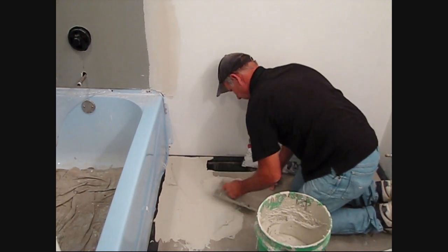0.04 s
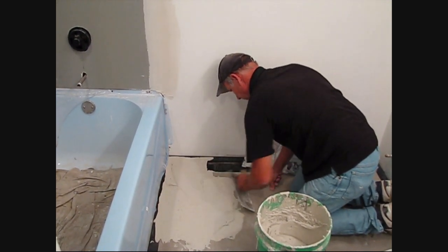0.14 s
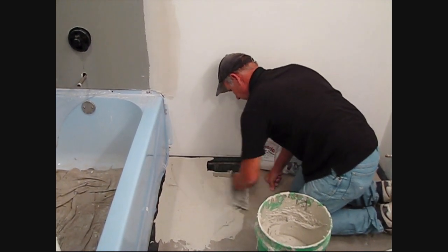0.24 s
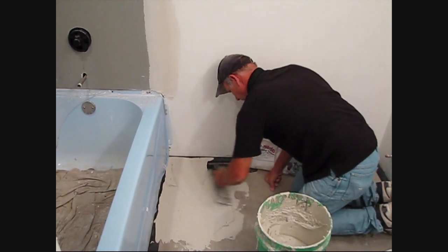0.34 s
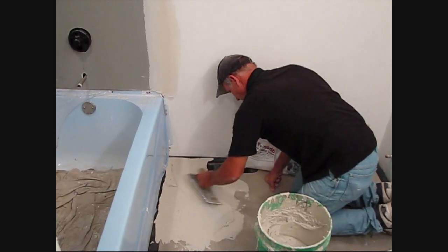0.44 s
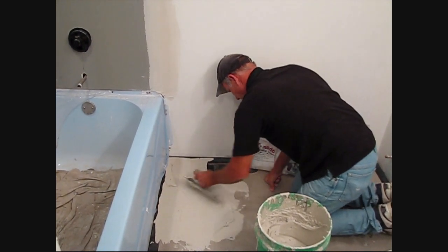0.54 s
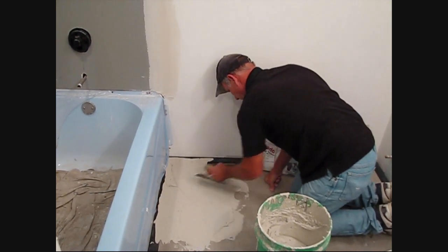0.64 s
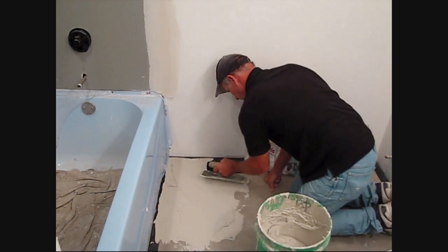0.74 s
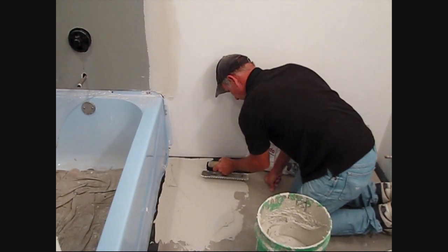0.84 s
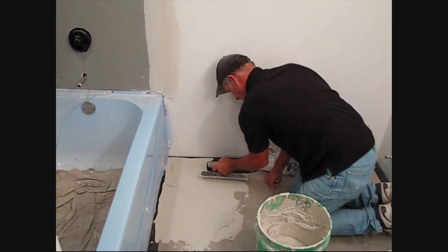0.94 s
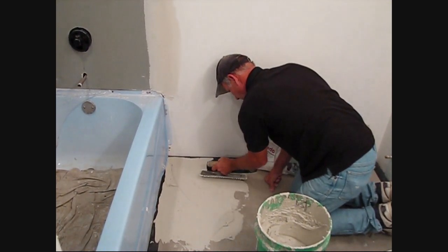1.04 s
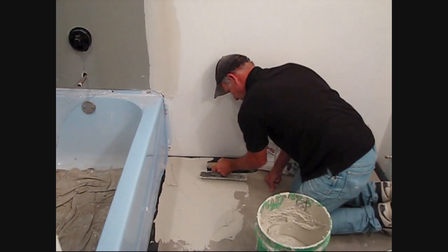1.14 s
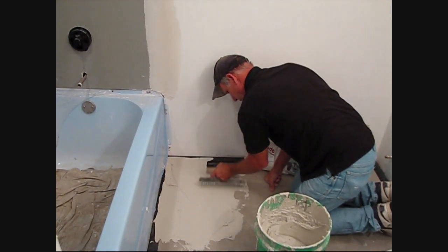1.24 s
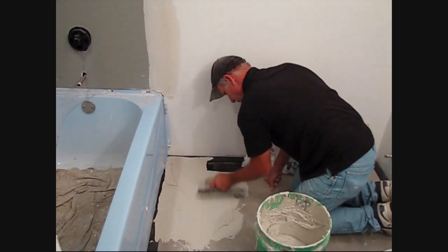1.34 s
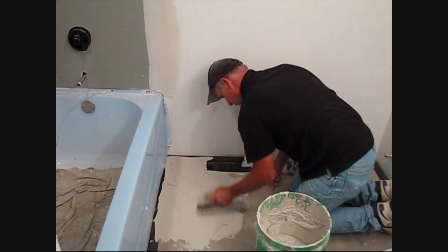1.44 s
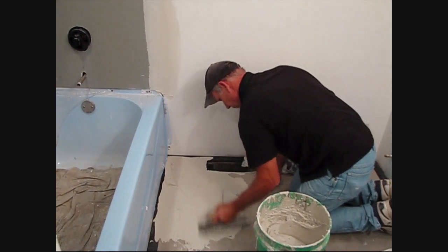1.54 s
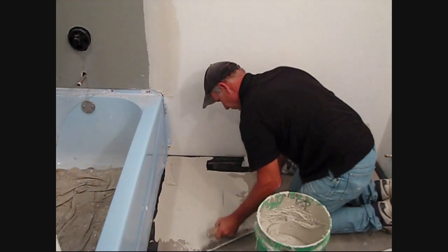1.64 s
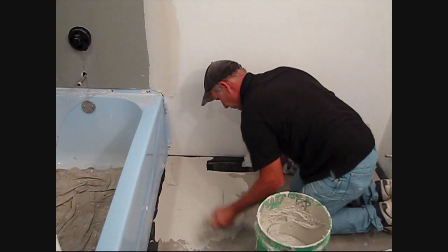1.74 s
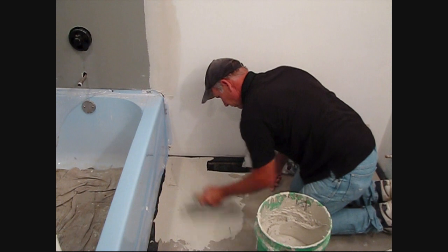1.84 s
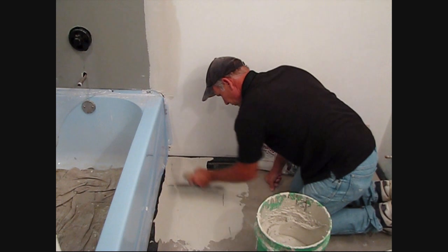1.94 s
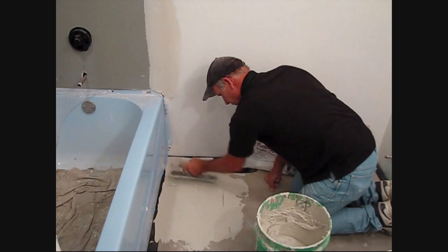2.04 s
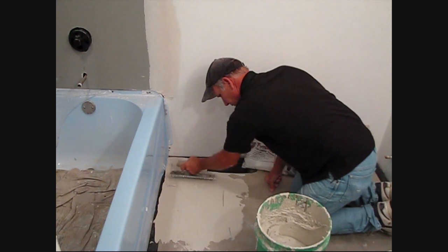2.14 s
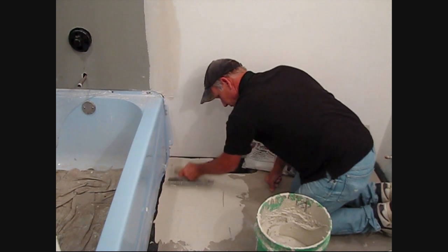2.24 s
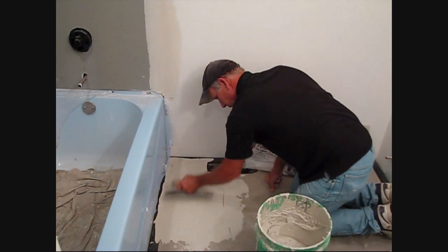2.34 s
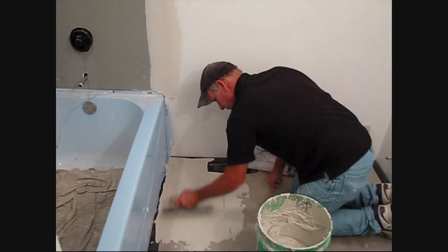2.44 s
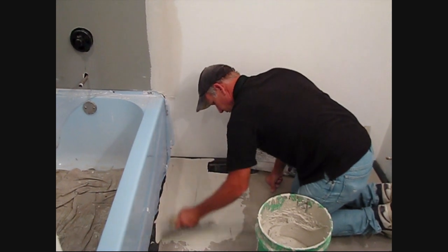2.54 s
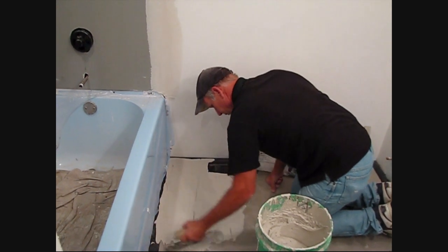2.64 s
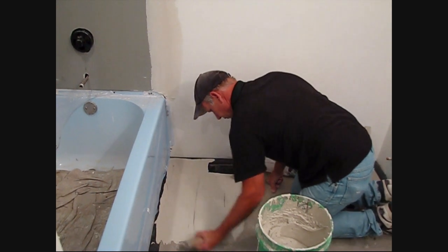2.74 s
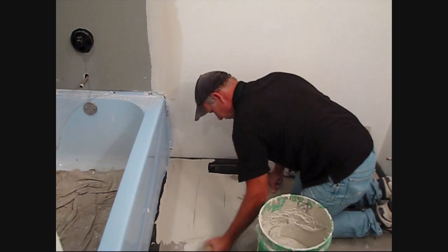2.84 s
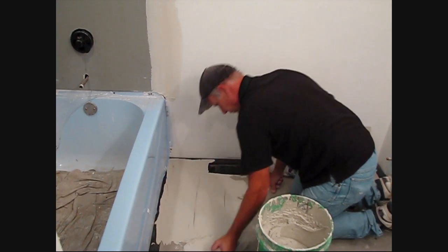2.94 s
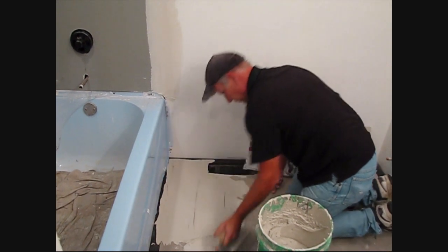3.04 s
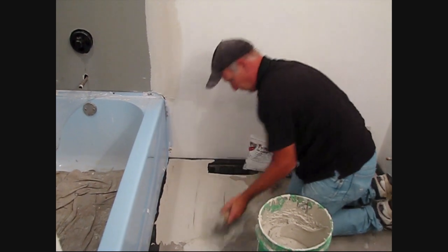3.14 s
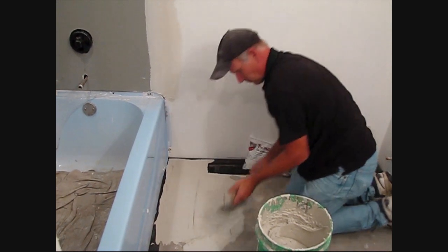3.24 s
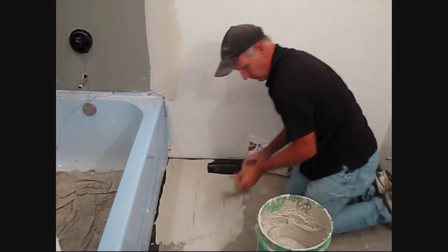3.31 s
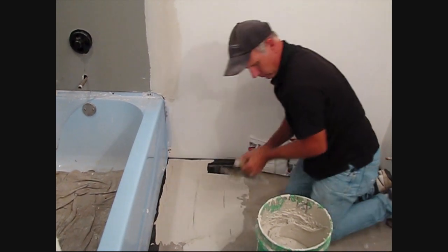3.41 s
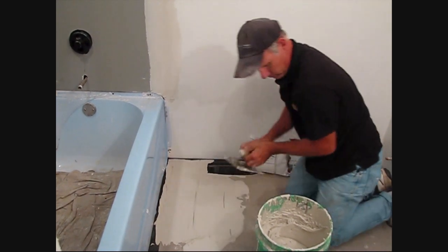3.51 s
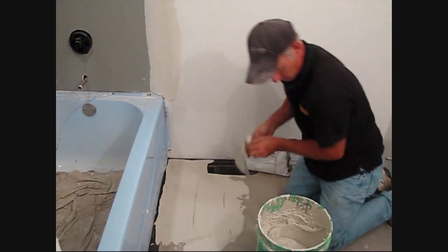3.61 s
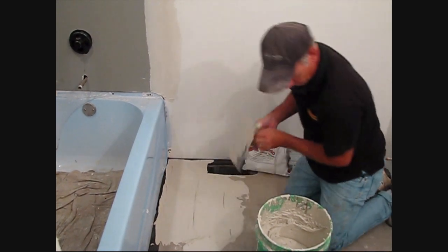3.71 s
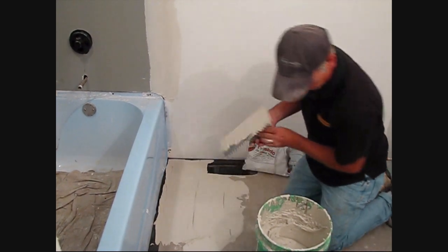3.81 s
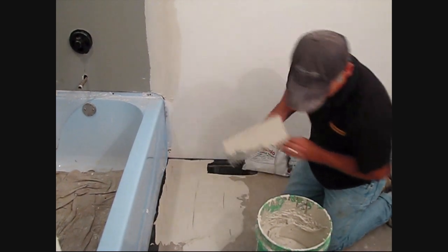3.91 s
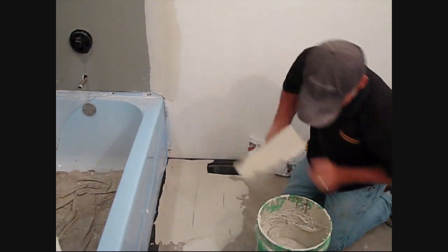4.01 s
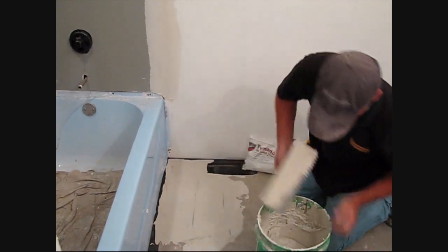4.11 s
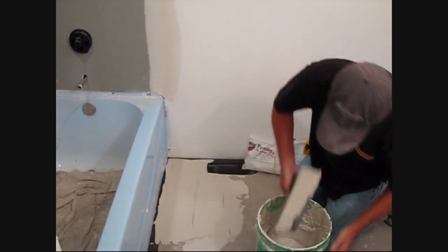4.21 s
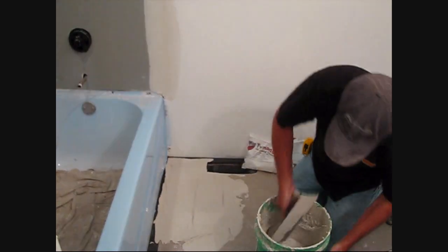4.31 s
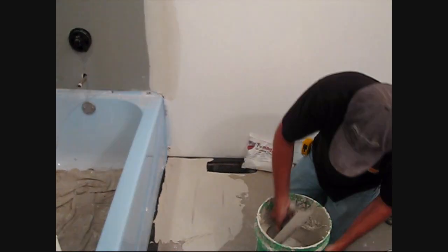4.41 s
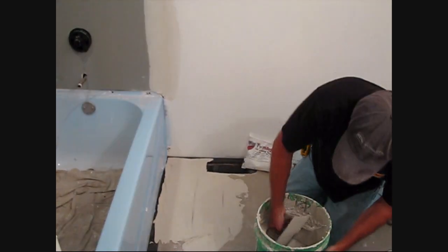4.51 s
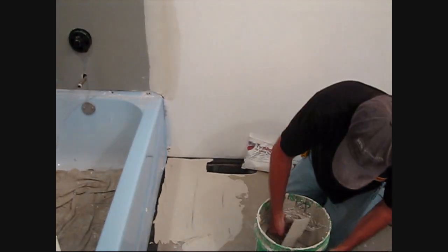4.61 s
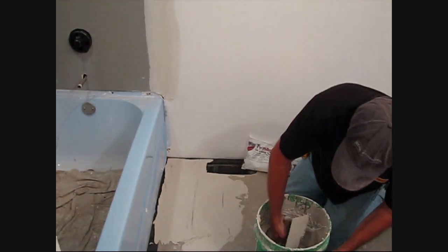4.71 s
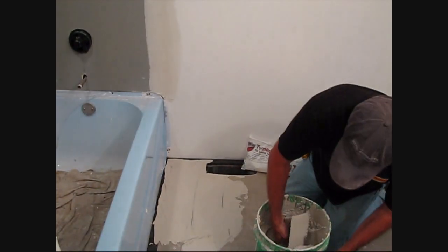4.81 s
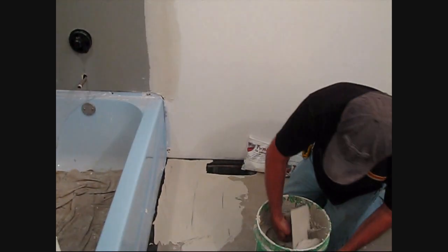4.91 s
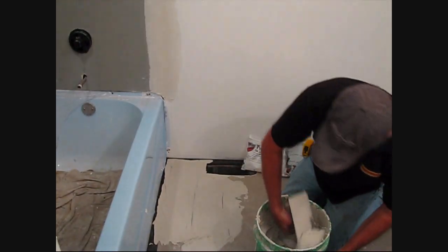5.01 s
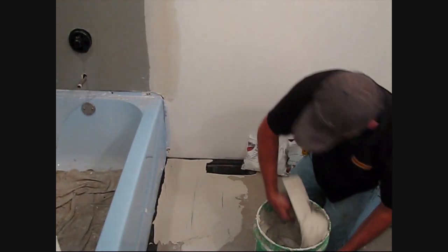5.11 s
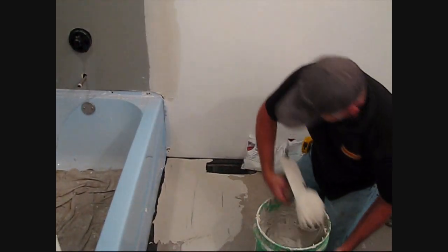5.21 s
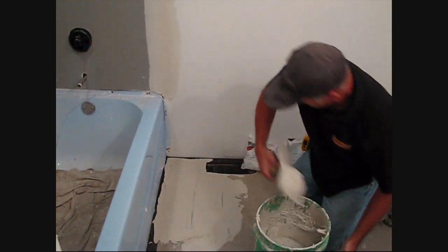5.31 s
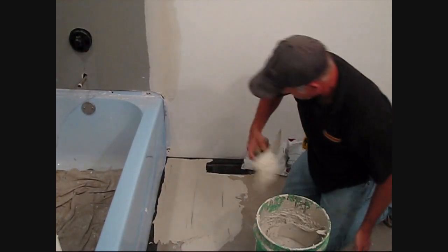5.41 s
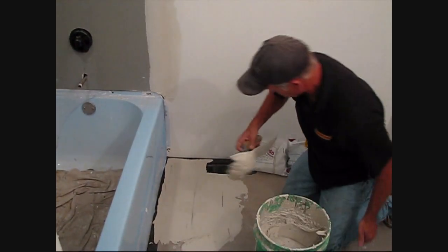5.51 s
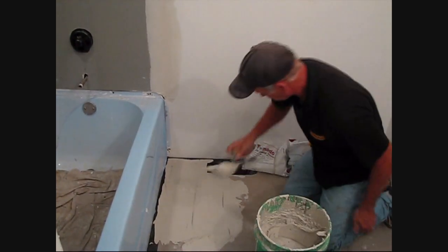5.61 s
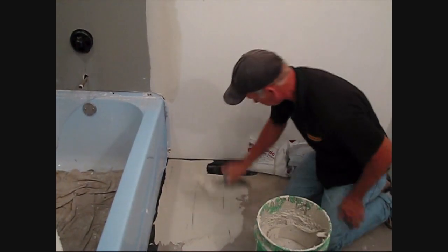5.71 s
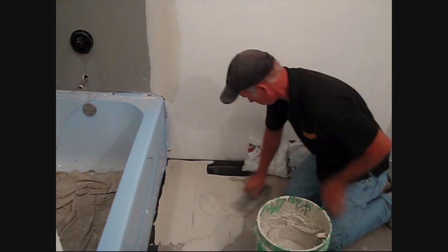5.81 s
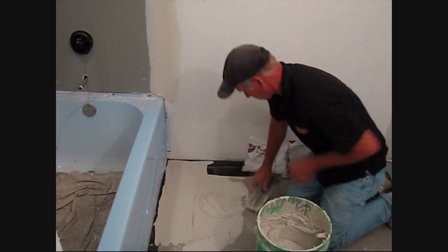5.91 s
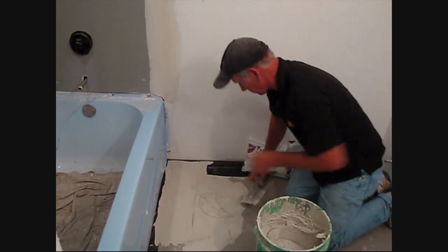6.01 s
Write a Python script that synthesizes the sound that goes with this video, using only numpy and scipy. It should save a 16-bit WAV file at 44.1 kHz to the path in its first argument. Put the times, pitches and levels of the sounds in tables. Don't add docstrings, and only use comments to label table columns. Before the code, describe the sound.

Close stereo microphone in a small hard-walled room with a low hum. Gritty steel scrapes come in bursts with gaps between, some short and bright, some longer and harsher. Around the middle they give way to quiet sleeve rustles and dull knee bumps. Squelchy scooping in a plastic bucket follows, growing into a rough hollow scrape, then near silence and one sharp wet smack with a low thud and short echo.

```python
import sys
import numpy as np
from scipy import signal
from scipy.io import wavfile
from scipy.ndimage import uniform_filter1d, map_coordinates

SR = 44100
rng = np.random.default_rng(int(sys.argv[2]) if len(sys.argv) > 2 else 0)


def digitize_waveform(pressure):
    field = np.atleast_2d(pressure).T
    bounded = np.clip(field, -1, 1)
    quanta = np.round(bounded * 32767).astype(np.int16)
    wavfile.write(sys.argv[1], SR, quanta)


def magnitude_from_level(level_db):
    exponent = np.asarray(level_db, float) / 20
    return 10 ** exponent


N = 267246

# f/Hz, level/dB per Hz
HUM_SPECTRUM = [(29, -24), (50, -24), (129, -2), (172, -6.5), (253, 0.5), (293, -1.5), (339, 3),
                (431, -15.5), (464, -5), (717, -17), (771, -10.5), (1110, -16), (6040, -27.5),
                (8070, -30.5), (16300, -38)]
# t/s, level/dB
HUM_LEVEL = [(0.0, -33.5), (.1, -64), (.3, -49), (.4, -51), (1.1, -44), (1.5, -46), (2.1, -46.5),
             (2.5, -38), (3.1, -44.5), (4.2, -43.5), (4.7, -39), (5.6, -42), (6.06, -42)]
# f/Hz, level/dB re usual hum
WHINE_TONES = [(7854, -83), (7881, -65)]
# t/s, level/dB, decay/s
KNEE_THUMPS = [(.33, -45, 0.027), (1.03, -43, 0.064), (1.972, -51, 0.097), (2.83, -32, 0.027),
               (3.14, -37, 0.24), (3.27, -42, .08), (3.38, -55, 0.034), (3.7, -46.5, 0.15),
               (3.92, -56, 0.11), (4.34, -40, 0.035), (4.46, -49, 0.21), (4.78, -48, 0.046),
               (5.11, -58, 0.094), (5.8, -50, 0.23)]
# level/dB, rise/s, decay/s
SLAP_BASS = (-27, 0.043, 0.052)

# f/Hz, correlation
PORT_LIKENESS = [(60, 0.86), (180, 1), (550, 0.94), (1650, 0.7), (4970, 0.021), (15000, 0.034)]
# f/Hz, t60/s
WALL_T60 = [(60, 0.05), (260, 0.12), (730, 0.48), (1840, 0.42), (4850, 0.36), (9000, 0.39), (15000, 0.29)]

# f/Hz, level/dB per Hz
GRIT_SPECTRUM = [(1290, -22.5), (2200, -8), (2740, -7), (3310, -7), (5140, -10), (8500, -22),
                 (11000, -32.5), (18700, -120)]
FIZZ_SPECTRUM = [(4410, -32.5), (7500, -8.5), (13500, -10), (16000, -14)]
SQUELCH_SPECTRUM = [(300, -50), (600, 9), (1200, 5), (2000, 9.5), (3000, 2.5), (4500, -5.5), (9000, -74)]

# t/s, rise/s, fall/(dB/s), grit level/dB, fizz level/dB re grit
CLOTH_BRUSHES = [
    (3.25, .11, 110, -43, -8),
    (3.49, 0.036, 74, -52.5, 3),
    (3.605, 0.013, 96, -45, -9),
    (3.8, 0.01, 41, -48, 1.5),
    (3.88, 0.029, 120, -50, 0),
    (4.0, 0.04, 10, -56, -12),
    (4.17, 0.044, 60, -52.5, -3),
    (5.33, 0.018, 17, -52.5, -8),
    (5.6, 0.055, 30, -62, -9),
]
# t/s, rise/s, fall/(dB/s), grit level/dB, squelch level/dB re grit
DIG_MOVES = [(4.297, 0.019, 148, -43.5, 17), (4.33, 0.028, 299, -39, 7.5), (4.44, 0.04, 39, -43.5, 1.5),
             (4.54, 0.04, 150, -43, 9), (4.654, 0.0033, 62, -35, 0), (4.74, 0.037, 122, -40.5, 5),
             (4.85, 0.073, 60, -46.5, 3), (4.96, 0.054, 68, -35.5, -2), (5.03, 0.0072, 150, -30.5, 5),
             (5.065, 0.07, 154, -20.5, 0.5), (5.12, 0.037, 295, -13.5, -3), (5.74, 0.11, 133, -40.5, 2)]
# f/Hz, width/Hz, level/dB
BUCKET_MODES = [
    (252, 220, -7.5),
    (330, 25, 12),
    (506, 4.6, 5),
]

# t/s, peak level/dB, length/s
LUMP_IMPACTS = [
    (5.8528, 3, 0.0044),
    (5.8561, -9.5, 0.00284),
    (5.88, -9, 0.0043),
    (5.87, -19.5, 0.088),
]
# f/Hz, level/dB per Hz
SLAP_SPECTRUM = [(15, -35), (25, 0), (150, -10.5), (237, -1), (613, -16.5), (826, -9.5), (945, -17.5),
                 (2130, -11.5), (3470, -17), (12800, -29.5), (16300, -35)]
# f/Hz, level/dB, decay/s
FLOOR_THUDS = [(67, -18, 0.048), (224, -16, 0.052), (379, -18, 0.014)]

# t/s, peak level/dB, f/Hz
GRAIN_SNAPS = [
    (0.015, -24, 2180),
    (0.0374, -22, 1870),
    (1.074, -24, 2110),
    (1.2212, -20, 2500),
    (2.6444, -29, 1520),
    (4.6573, -20.5, 1690),
]
# t/s, length/s, f/Hz, level/dB
MODE_SINGS = [(0.036, 0.093, 714, -28.5), (.13, .13, 730, -39), (.375, 0.058, 1860, -18),
              (0.531, 0.088, 744, -27.5), (.64, .17, 740, -49), (1.261, 0.081, 723, -25.5),
              (1.26, 0.085, 335, -29), (1.467, 0.12, 1535, -18), (2.32, 0.041, 1400, -26),
              (2.375, 0.043, 1150, -30), (2.42, 0.14, 1444, -33), (2.632, 0.056, 315, -26.5),
              (2.858, 0.073, 1670, -20.5), (2.985, 0.043, 1800, -16.5), (3.016, .05, 1060, -19),
              (3.03, 0.11, 710, -25.5), (3.18, 0.066, 1176, -39), (3.23, 0.0675, 700, -51),
              (4.96, 0.072, 313, -32), (5.025, 0.048, 327, -24.5), (5.141, 0.063, 280, -19)]
# t/s,
# length/s, f/Hz, level/dB
WIDE_SCUFFS = [(1.072, .008, 8100, -37), (1.47, .12, 530, -32), (1.219, 0.085, 1510, -27),
               (2.38, 0.033, 2840, -28), (2.44, .13, 2670, -29), (2.84, 0.12, 545, -35),
               (2.99, .1, 330, -35.5), (3.03, 0.099, 543, -33.5), (3.624, .04, 2850, -45),
               (4.298, .03, 169, -33.5), (4.3, 0.096, 339, -30.5), (4.302, 0.098, 3000, -38),
               (4.55, .07, 1500, -44), (4.654, 0.089, 330, -31.5), (4.655, 0.053, 757, -33.5),
               (4.74, 0.13, 750, -36), (5.853, .012, 1480, -11.5), (5.89, 0.093, 356, -29)]

# t/s, rise/s, fall/(dB/s), grit level/dB, upper ring f/Hz
BLADE_STROKES = [(.016, 0.0055, 241, -19, 1910), (.09, 0.035, 271, -43, 1970),
                 (.319, 0.0084, 64, -31, 1740), (.35, 0.048, 257.5, -27, 1920), (.5, .05, 210, -30, 1970),
                 (1.043, 0.0019, 48, -40, 1360), (1.13, 0.047, 60, -41.5, 2380),
                 (1.219, 0.0022, 106, -30, 2270), (1.23, 0.031, 201, -22, 2060),
                 (1.3, 0.017, 150, -29.5, 1490), (1.455, 0.029, 115, -25.5, 1580),
                 (1.53, 0.033, 294, -30, 1470), (1.62, 0.026, 255, -25.5, 1750),
                 (1.69, 0.048, 454, -33, 1530), (2.25, 0.034, 60, -46.5, 1570),
                 (2.322, 0.0092, 62, -41.5, 1310), (2.35, 0.046, 150, -35, 1180),
                 (2.42, 0.093, 28, -37.5, 1530), (2.55, 0.017, 100, -34, 1560),
                 (2.6, 0.041, 242, -21.5, 1450), (2.828, 0.055, 180, -19.5, 1560),
                 (2.972, 0.022, 188, -17, 1700), (3.02, 0.046, 330, -25.5, 1450),
                 (3.15, 0.039, 120, -46, 1250)]
# t/s, then low ring, upper ring and fizz level/dB re grit
HAND_GRIP = [(.03, 0.5, 10.3, -5), (.12, 3.5, 19, 0), (.33, 8, 9, 2.5), (0.412, 6.5, 14.6, 1),
             (.56, 6, 9.1, 1), (1.1, 0, 1.8, -7), (1.25, 3, 5.2, -0.5), (1.34, 6.5, 11.5, 0),
             (1.5, 5, 13.9, 2), (1.66, -2.5, 9.8, 2), (1.75, 0, 9.5, -4.5), (2.291, -15, 0.33, 0),
             (2.35, -16, 14.6, 3), (2.52, 7.5, 15.4, 3), (2.64, 2, 5.5, 0.5), (2.88, -5, 4.2, 4),
             (3.0, -7, 1, -5), (3.1, -4, 1.6, -6)]
# f/Hz, width/Hz, level/dB
LOW_BLADE_MODES = [(430, 150, -6), (560, 110, -4), (650, 70, -4), (735, 45, 1), (840, 90, -4),
                   (950, 90, -4)]
UPPER_BLADE_MODES = [(1060, 26, 0.5), (1265, 73, 5.5), (1376, 89, -6), (1535, 66, 3), (1770, 51, -10),
                     (1800, 18, 1), (1909, 89, -3), (1977, 134, 4), (2430, 30, -3), (2370, 72, -9),
                     (2660, 6.5, -17)]


def evened(x):
    return x / np.sqrt(np.mean(x ** 2) + 1e-20)


def read(points, hz):
    f, value = np.transpose(points)
    return np.interp(np.log(hz + 1), np.log(f + 1), value)


def curve(rows):
    s, value = np.transpose(rows)
    return np.interp(np.arange(N) / SR, s, value)


def colour(x, points):
    gain_db = np.maximum(read(points, abs(np.fft.fftfreq(8192, 1 / SR))), -90)
    log_gain = np.log(magnitude_from_level(gain_db))
    taps = np.fft.ifft(np.exp(np.conj(signal.hilbert(log_gain)))).real[:4096]
    return signal.oaconvolve(x, taps)[:len(x)]


def resonate(x, hz, width):
    turn = np.exp(2j * np.pi * np.cumsum(hz * np.ones(len(x))) / SR)
    r = np.exp(-np.pi * width / SR)
    return 2 * (turn * signal.lfilter([1 - r], [1, -r], x / turn)).real


def ring(x, modes):
    out = np.zeros(len(x))
    for k, (hz, width, db) in enumerate(modes):
        r = np.exp(-np.pi * width / SR)
        pole = r * np.exp(2j * np.pi * hz / SR)
        out += (-1) ** k * magnitude_from_level(db) * signal.lfilter([1 - r], [1, -pole], x).real
    return out


def in_band(x, lo_hz, hi_hz):
    bandpass = signal.butter(4, [lo_hz, hi_hz], "bandpass", fs=SR, output="sos")
    band = signal.sosfilt(bandpass, x)
    return x / np.sqrt(np.mean(band ** 2))


def swell(s, db, rise, decay):
    out = np.zeros(N)
    part = out[round(s * SR):][:SR]
    u = np.arange(len(part)) / SR
    part += magnitude_from_level(db) * np.minimum(u / rise, 1) * np.exp(-np.maximum(u - rise, 0) / decay)
    return out


def contact(table, fade=1, lag_s=0):
    floor, rise_power = 1e-7, 0.94
    power_sum = np.full(N, floor)
    mixed = np.full(N, floor * table[0][4])
    for s, rise, fall_db, db, value in table:
        at = round((s + lag_s) * SR)
        length_s = min(rise + 50 / fall_db, 1)
        t = np.arange(min(round(length_s * SR), N - at)) / SR
        fallen_db = fade * fall_db * np.maximum(t - rise, 0)
        power = np.minimum(t / rise, 1) ** (2 * rise_power) * magnitude_from_level(2 * (db - fallen_db))
        power_sum[at:at + len(t)] += power
        mixed[at:at + len(t)] += power * value
    return np.sqrt(power_sum - floor), mixed / power_sum


def diffuse(frames, size):
    hz = np.fft.rfftfreq(size, 1 / SR)
    a, b, c, d = rng.standard_normal((frames, len(hz), 4)).T
    same = np.clip(read(PORT_LIKENESS, hz), -1, 1)[:, None]
    left = a + 1j * b
    right = same * left + np.sqrt(1 - same ** 2) * (c + 1j * d)
    return hz, np.array([left, right])


def background():
    hz, z = diffuse(frames=N // 512 + 5, size=2048)
    z = z * magnitude_from_level(read(HUM_SPECTRUM, hz))[:, None]
    hum = evened(signal.istft(z, nperseg=2048, noverlap=1536)[1][:, :N])
    level = magnitude_from_level(curve(HUM_LEVEL))
    hum_level = level + swell(LUMP_IMPACTS[0][0], *SLAP_BASS)

    t = np.arange(N) / SR
    whine = sum(magnitude_from_level(db + 44.5) * np.sin(2 * np.pi * f * t) for f, db in WHINE_TONES)

    boards = ring(rng.standard_normal(N), [(23.8, 23, 0)])
    boards = evened(ring(boards, [(33.6, 97, 0)]))
    rise_s = 0.027
    thumps = sum(swell(s - rise_s, db, rise_s, decay) for s, db, decay in KNEE_THUMPS)
    knees = level * magnitude_from_level(-10) + thumps
    return hum_level * magnitude_from_level(0.5) * hum + level * whine + knees * boards


def sway(x, depth_s, per_s):
    t = np.arange(N) / SR
    rates = rng.uniform(.4, 1.6, size=4)
    path = sum(np.sin(2 * np.pi * (f * per_s * t + rng.random())) for f in rates)
    return map_coordinates(x, [np.arange(N) + depth_s * SR * path], order=3)


def room(x):
    out = np.zeros((2, N))
    turn = np.arange(N) / SR * 25
    for k in range(3):
        hz, z = diffuse(frames=220, size=512)
        frame_s = np.arange(220) * 128 / SR
        z *= magnitude_from_level(-60 * frame_s / read(WALL_T60, hz)[:, None])
        tail = signal.istft(z, nperseg=512, noverlap=384)[1]
        tail *= np.minimum(np.arange(tail.shape[1]) / (0.013 * SR), 1)
        tail /= np.linalg.norm(tail, axis=1, keepdims=True)
        share = np.sqrt(8 / 9) * np.cos(turn + k * np.pi / 3) ** 2
        wet = signal.oaconvolve(x[None] * share, tail, axes=1)[:, :N]
        out += [sway(port, depth_s=.000025, per_s=9) for port in wet]
    return out


def near_walls(x):
    n = np.arange(600)
    taps = rng.standard_normal(600) * np.exp(-n / (0.0048 * SR)) * (n > 10)
    treble = signal.butter(1, 2500, "highpass", fs=SR)
    unlike = signal.lfilter(*treble, taps / np.linalg.norm(taps))
    direct = x * magnitude_from_level(np.array([[-.2], [.2]]))
    return direct + 0.83 * np.array([[1], [-1]]) * signal.oaconvolve(x, unlike)[:N]


def grains(per_s, spread_db):
    size = magnitude_from_level(spread_db * np.minimum(rng.exponential(1, N), 5)) * rng.standard_normal(N)
    return evened(size * (rng.random(N) < per_s / SR))


def hiss(sand, grit, fizz):
    coarse = in_band(colour(sand, GRIT_SPECTRUM), 2950, 11000)
    return grit * coarse + fizz * evened(colour(sand, FIZZ_SPECTRUM))


def clumped_sand():
    clumps = magnitude_from_level(2.2 * evened(uniform_filter1d(rng.standard_normal(N), size=500)))
    return evened(clumps * grains(per_s=14000, spread_db=-2.5))


def soft_body(sand):
    squelch = evened(colour(sand, SQUELCH_SPECTRUM))
    return evened(1.1 * squelch + 0.44 * evened(resonate(sand, 1130, 710)))


def rustles():
    cloth, fizz_db = contact(CLOTH_BRUSHES)
    sand = clumped_sand()
    return hiss(sand, cloth, cloth * magnitude_from_level(fizz_db)) + cloth * magnitude_from_level(0.5) * soft_body(sand)


def digs():
    grit, squelch_db = contact(DIG_MOVES)
    sand = clumped_sand()
    boom = evened(ring(ring(sand, [(330, 270, 0)]), BUCKET_MODES))
    scrape = hiss(sand, grit, magnitude_from_level(-12) * grit ** 0.9)
    squelch = grit * magnitude_from_level(squelch_db) * soft_body(sand)
    return scrape + squelch + magnitude_from_level(-17.5) * grit ** 0.6 * boom


def slap():
    t, splash, smack = np.arange(N) / SR, np.zeros(N), np.zeros(N)
    for s, db, length in LUMP_IMPACTS:
        u = np.maximum(t - s, 0) / length
        splash += magnitude_from_level(db) * u * 4.4 * np.exp(-u * 1.88)
        smack[round((s + length / 2) * SR)] = magnitude_from_level(db)
    splash = splash * evened(colour(rng.standard_normal(N), SLAP_SPECTRUM))
    smack = colour(smack, SLAP_SPECTRUM)
    after = np.maximum(t - LUMP_IMPACTS[0][0], 0)
    thud = np.zeros(N)
    for hz, db, decay in FLOOR_THUDS:
        thud += magnitude_from_level(db) * np.sin(2 * np.pi * hz * after) * np.exp(-after / decay)
    return magnitude_from_level(-7.5) * splash + 0.91 * smack / abs(smack).max() + thud


def snaps():
    out, t = np.zeros(N), np.arange(300) / SR
    for s, db, hz in GRAIN_SNAPS:
        tick = np.sin(2 * np.pi * hz * t) * np.exp(-t / 0.00025)
        out[round(s * SR):][:len(t)] += magnitude_from_level(db + 13) * tick
    return signal.lfilter(*signal.butter(2, 500, "highpass", fs=SR), out)


def sings(table, width_hz, spread, onset):
    out = np.zeros(N)
    all_slips = rng.standard_normal((len(table), SR // 4))
    for (s, length, hz, db), slips in zip(table, all_slips):
        width = width_hz + spread * hz
        tone = ring(slips, [(hz, width, 0)])
        tone = ring(tone, [(hz, 2 * width, 0)])[-round(length * SR):]
        progress = np.linspace(0, 1, len(tone))
        shape = np.interp(progress, [0, onset, .7, 1], [0.25, 0.81, 0.75, 0.042])
        out[round(s * SR):][:len(tone)] += magnitude_from_level(db) * evened(tone) * shape
    return out


def strokes():
    grit, upper_hz = contact(BLADE_STROKES)
    fizz = contact(BLADE_STROKES, fade=1.15)[0]
    late = contact(BLADE_STROKES, fade=0.78, lag_s=0.013)[0]
    s, low_db, upper_db, fine_db = np.transpose(HAND_GRIP)
    sand = grains(per_s=12000, spread_db=1.5)

    low = resonate(resonate(sand, 787, 660), 787, 660)
    low = evened(ring(low, LOW_BLADE_MODES))
    free = resonate(resonate(sand, upper_hz, 1000), upper_hz, 980)
    upper = evened(0.44 * evened(free) + .5 * evened(ring(free, UPPER_BLADE_MODES)))

    low_ring = late * magnitude_from_level(curve(np.c_[s, low_db])) * low
    upper_ring = grit * magnitude_from_level(curve(np.c_[s, upper_db])) * upper
    fizz = magnitude_from_level(-5 + curve(np.c_[s, fine_db])) * fizz
    return hiss(sand, grit, fizz) + low_ring + upper_ring


def scene():
    edge = sings(MODE_SINGS, width_hz=22, spread=0.024, onset=0.21)
    edge += sings(WIDE_SCUFFS, width_hz=0, spread=0.21, onset=0.024)
    near = magnitude_from_level(-1.5) * (strokes() + digs() + rustles()) + edge + snaps() + slap()
    return magnitude_from_level(-2) * near_walls(near) + magnitude_from_level(-4.0) * room(near) + background()


def low_pass(x):
    return signal.sosfilt(signal.butter(12, 16440, fs=SR, output="sos"), x)


def record(dry):
    lowpass = signal.firwin(511, 15780, window=("kaiser", 8), fs=SR)
    limited = signal.oaconvolve(dry, lowpass[None], "same")
    mix = np.clip(limited, -1, 1)
    return low_pass(mix)


dry = scene()
out = record(dry)
digitize_waveform(out)
```